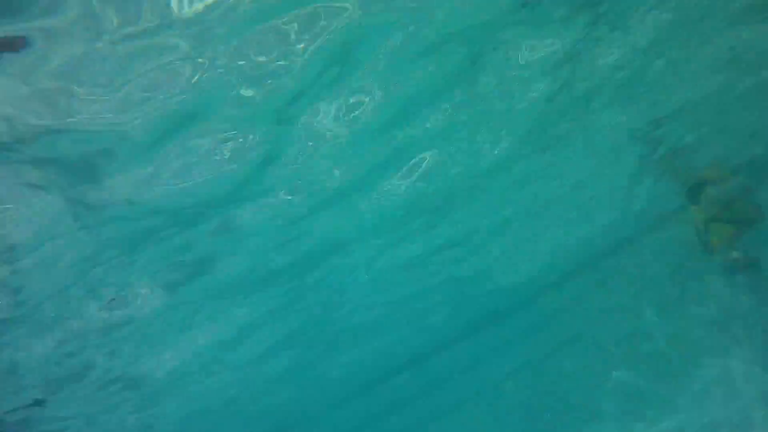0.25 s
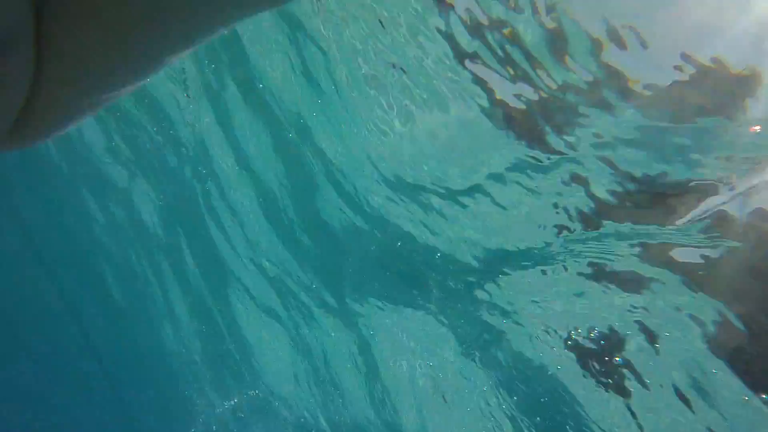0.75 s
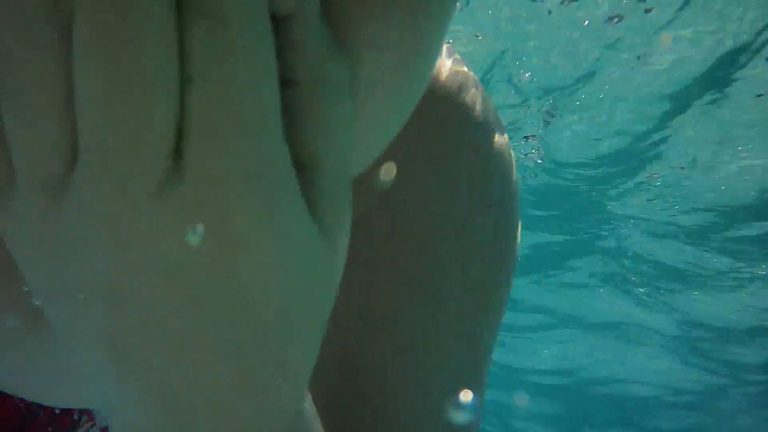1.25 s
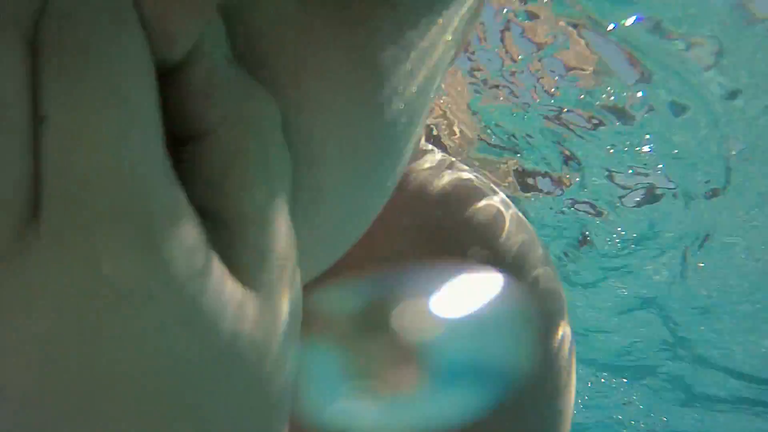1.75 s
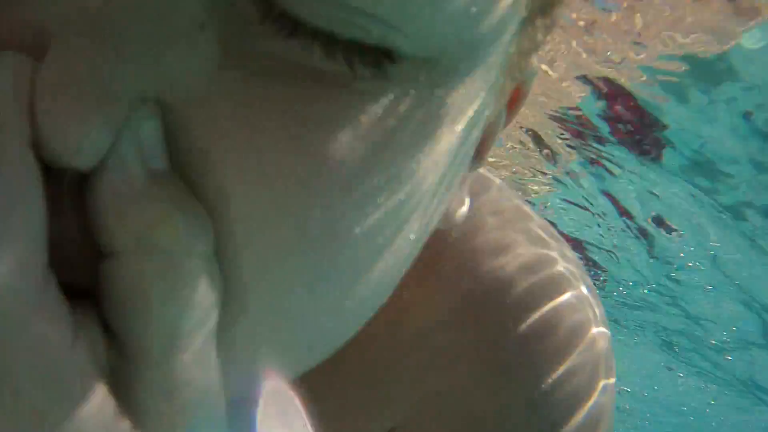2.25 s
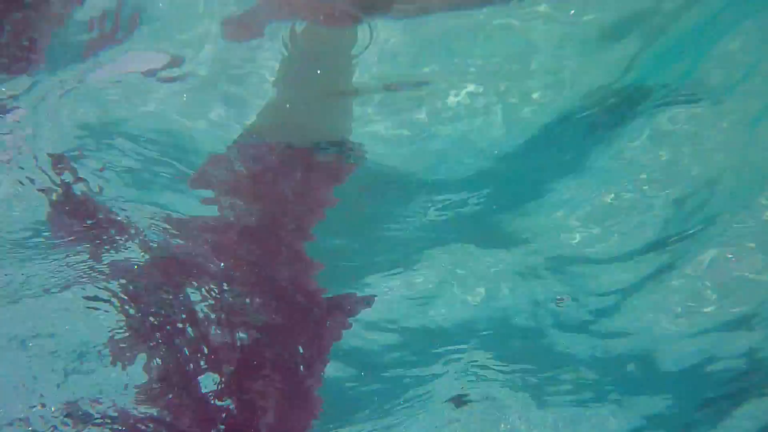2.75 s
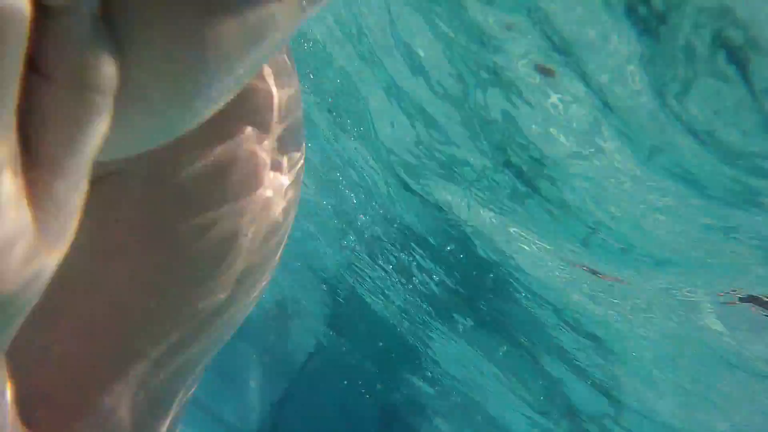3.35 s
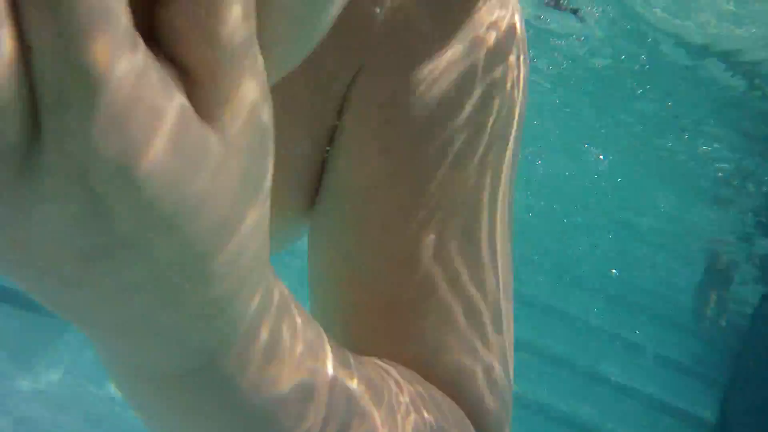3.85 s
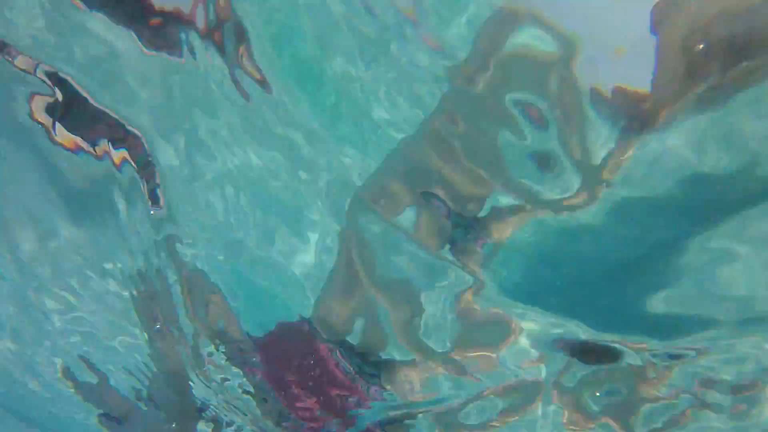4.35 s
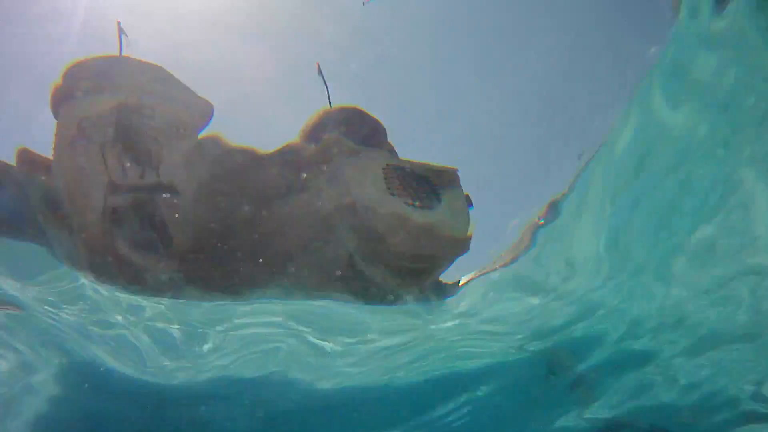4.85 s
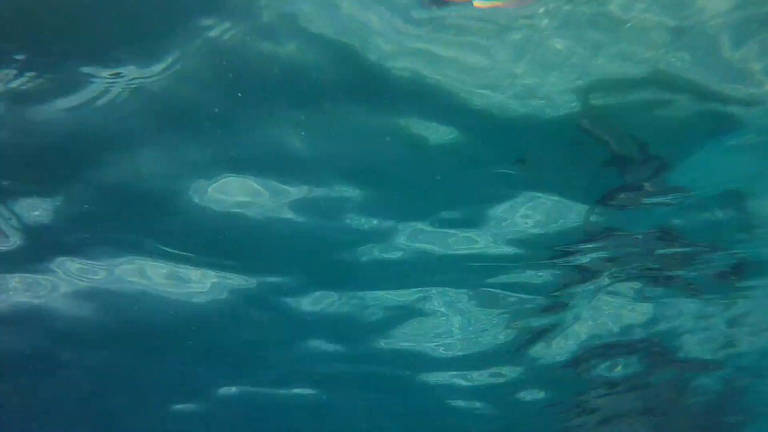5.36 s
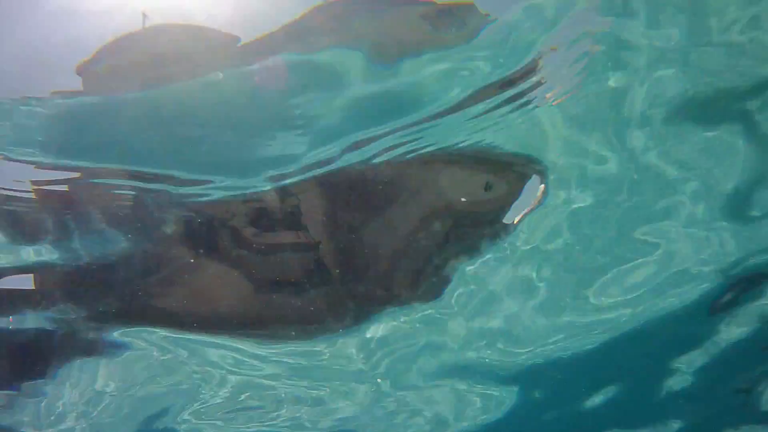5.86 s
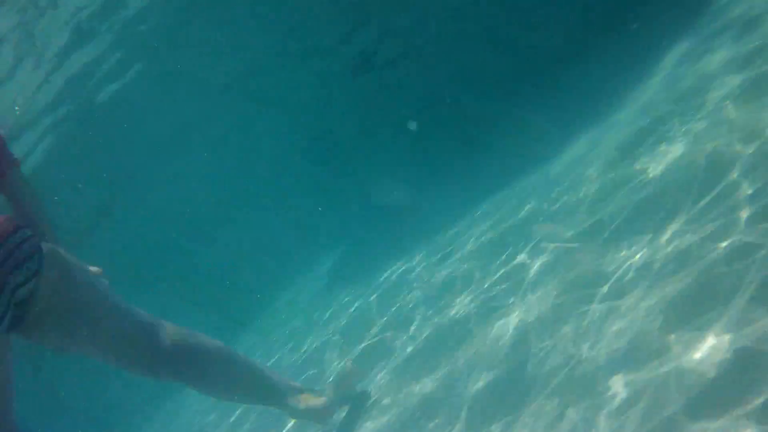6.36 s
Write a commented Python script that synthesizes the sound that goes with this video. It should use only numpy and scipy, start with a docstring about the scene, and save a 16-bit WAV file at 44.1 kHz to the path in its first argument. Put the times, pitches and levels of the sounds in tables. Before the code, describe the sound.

A small camera in a plastic housing is moved about under water in a pool. A low, lumpy surge and faint hiss run throughout. Hollow knocks and tiny bubble plinks come first, then a short rush of froth and a flurry of louder knocks. A quieter stretch of scattered bloops and taps follows, until a loud plunge gulps, sprays and trails off in bubbles. Everything sounds muffled, with a gritty treble edge.

```python
"""Water surges against a microphone port over a faint hiss: a small camera in a plastic housing is being
moved about under water in a pool. Knocks of water ring the housing, bubbles plink and bloop, froth rushes
past, and a plunge ends the scene. The recorder samples at 6 kHz and holds each value, which mirrors all
sound up into the treble."""
import sys
import numpy as np
from scipy import signal
from scipy.fft import rfft, irfft
from scipy.io import wavfile

SR = 44100
rng = np.random.default_rng(int(sys.argv[2]) if len(sys.argv) > 2 else 0)


def generate_wav(sig):
    """Save sig (samples, or channels by samples) to the path in sys.argv[1] as 16-bit PCM at SR."""
    pcm = np.round(np.clip(np.atleast_2d(sig).T, -1, 1) * 32767).astype(np.int16)
    wavfile.write(sys.argv[1], SR, pcm)


N = 291711

# The tone of the surge. Each row: frequency in Hz, relative level in dB.
SURGE_SPECTRUM = [(2, -0.5), (6, -4), (12, -0.5), (25, -13.5), (50, -19.5), (100, -33.5), (200, -45),
                  (400, -70)]
# Water pushing past the port. Each row: time in seconds, surge level in dB.
SURGE_LEVELS = [(0.0, -48), (0.03, -38.5), (0.44, -29.5), (0.92, -25), (0.99, -16), (1.53, -33.5),
                (1.56, -29), (2.56, -36.5), (2.72, -18.5), (3.11, -25), (3.18, -21), (3.29, -43),
                (3.33, -19.5), (3.79, -26), (4.07, -33), (4.14, -24), (4.67, -35), (4.8, -25), (4.86, -38),
                (5.71, -38), (5.93, -16), (6.61, -36)]
# Far hiss in the housing. Each row: time in seconds, low wash in dB, high wash in dB.
WASH_LEVELS = [(0.0, -60, -63), (0.18, -51.5, -55), (0.39, -46.5, -55), (0.77, -49, -55), (1.01, -39, -46),
               (1.16, -50.5, -54), (1.62, -54, -56), (2.17, -60, -54.5), (2.58, -54.5, -56.5),
               (2.98, -48.5, -48.5), (3.59, -49, -50), (3.96, -52, -54), (5.19, -48, -52.5),
               (5.74, -53.5, -58), (5.93, -57, -53), (6.09, -29.5, -35), (6.39, -44, -54), (6.61, -47, -53)]
# The housing's low body and high wall modes. Each row: pitch in Hz, width in Hz, relative level in dB.
BODY_MODES = [(216, 40, -15), (328, 70, -6.5), (499.7, 36.4, 7), (630.5, 128, 0)]
WALL_MODES = [(1003, 83, 4), (1417, 107, -1), (1595, 273, 0.5), (2000, 206, -6.5), (2403, 77, -2),
              (2573, 340, -5)]
# Water hitting the housing. Each row: start in seconds, thud in dB, air pocket pitch in Hz, crack in dB.
WATER_KNOCKS = [(0.129, -36.5, 460, -53), (0.187, -35, 382, -54), (0.225, -25, 227, -46.5),
                (0.27, -17.5, 416, -32.5), (0.277, -14.5, 465, -27), (0.314, -24, 424, -49),
                (0.369, -21.5, 404, -43), (0.485, -21.5, 433, -40), (0.796, -29.5, 686, -33.5),
                (0.838, -32.5, 420, -44.5), (0.858, -29.5, 277, -47), (0.93, -46, 202, -40),
                (0.947, -23.5, 326, -40), (0.969, -28, 484, -36), (0.981, -29, 364, -42),
                (1.03, -26, 248, -47), (1.048, -15, 370, -29.5), (1.057, -10.5, 490, -26.5),
                (1.071, -12, 470, -29), (1.075, -16.5, 500, -27.5), (1.083, -20, 480, -37),
                (1.097, -16, 500, -31.5), (1.114, -27, 245, -33), (1.136, -18, 373, -33),
                (1.148, -20, 310, -32), (1.17, -15.5, 330, -32.5), (1.194, -21, 494, -60),
                (1.338, -36, 630, -47.5), (1.408, -33, 450, -57), (2.648, -35.5, 358, -66),
                (2.904, -32, 390, -47), (2.993, -36.5, 520, -49), (3.37, -28, 490, -50),
                (3.407, -28.5, 294, -46), (4.377, -31, 483, -49), (4.581, -26.5, 488, -39),
                (4.627, -28, 484, -44), (4.729, -36, 463, -52), (4.771, -32, 510, -55),
                (4.89, -36, 466, -56.5), (5.463, -36, 496, -44.5), (6.011, -15, 474, -23),
                (6.098, -13, 474, -24), (6.143, -21, 514, -32), (6.25, -26.5, 473, -53)]
# Small bubbles bursting. Each row: start in seconds, relative level in dB, pitch in Hz.
BURSTING_BUBBLES = [(0.387, -35, 2390), (0.44, -35, 1800), (0.4486, -32.5, 1580), (0.4567, -32, 2380),
                    (0.487, -28, 2010), (0.4944, -32.5, 2110), (0.5074, -34, 2000), (0.5954, -52, 1490),
                    (0.622, -25.5, 2030), (0.6623, -33, 1820), (6.0244, -9, 1720), (6.0779, -5.5, 2270),
                    (6.0771, -6.5, 1390), (6.1414, -24.5, 1330), (6.2054, -20.5, 2740),
                    (6.2331, -19.5, 1060), (6.2454, -42, 1460), (6.2694, -34.5, 2360), (6.288, -31, 2350),
                    (6.3044, -37, 2380), (6.336, -29.5, 2540), (6.3434, -34.5, 2360), (6.3623, -41, 2000),
                    (6.372, -35, 2390), (6.4364, -31.5, 2800)]
# Ringing bubbles and low thuds of water. Each row: start in seconds, pitch in Hz,
# glide in octaves per second, level in dB, seconds to fall by 60 dB.
BLOOPS_AND_THUDS = [(.797, 730, -5.5, -33, 0.22), (1.5, 226.8, -8, -33, .05), (1.283, 460, 4, -40, 0.22),
                    (1.348, 670, -1.5, -29, 0.12), (1.582, 500, 0, -32, 0.084),
                    (2.521, 1630, -0.5, -38.5, 0.048), (3.091, 546, 0.5, -23, 0.057),
                    (3.215, 675, 1, -33, 0.082), (3.36, 431, 2.5, -30, 0.14), (3.502, 506, 2, -33, 0.13),
                    (4.045, 1350, 2, -35.5, 0.076), (4.18, 593, 4, -33.5, 0.067),
                    (4.325, 498, 4.5, -29, 0.11), (4.505, 1935, -5.5, -29, 0.048),
                    (4.518, 1440, -2.5, -33, 0.042), (4.634, 508, -2.5, -32, .14),
                    (4.755, 1036, -2, -35, 0.053), (4.774, 89, -15, -22.5, 0.11),
                    (5.463, 1480, 2.5, -32, .05), (5.945, 300, 6.5, -5, 0.24), (6.1, 120, -8, -29, .07),
                    (6.335, 463, 0.5, -23, 0.1), (6.525, 2900, 5, -34, 0.035)]
# Froth sweeping over the housing. Each row: start, rise and hold in seconds, gulp in dB, spray in dB.
FROTH_RUSHES = [(.8, .03, 0.095, -52, -41), (0.92, 0.047, 0.019, -34, -24.5),
                (1.043, 0.011, 0.061, -30, -32), (5.893, 0.063, 0.06, -9.5, -4),
                (6.044, 0.022, 0.028, -23, -11.5), (6.189, 0.044, 0.0058, -50, -21),
                (6.283, 0.039, 0.12, -54, -48)]
# The air pocket under the froth. Each row: pitch in Hz, width in Hz, relative level in dB.
GULP_MODES = [(338, 58, -10), (460, 79, -2), (666, 46, -19.5)]

POCKET_WIDTH_HZ, POCKET_SWELL_HZ = 91, 300
FROTH_RISE_DB, GULP_FALL_DB_S, SPRAY_FALL_DB_S = 26.5, 269, 300
SAMPLE_HZ, GUARD_HZ, CUTOFF_HZ, DC_OFFSET = 6000, 3050, 16150, 0.03


def from_db(db):
    return 10 ** (np.asarray(db) / 20)


def rms_one(x):
    return x / np.sqrt(np.mean(x ** 2) + 1e-20)


def butter(x, hz, kind, order):
    return signal.sosfilt(signal.butter(order, hz, kind, fs=SR, output="sos"), x)


def fader_curves(rows):
    """Each level column of a table, drawn out to one value per sample."""
    times, *columns = np.transpose(rows)
    return [np.interp(np.arange(N) / SR, times, column) for column in columns]


def drift(rate_hz):
    """A smooth random wobble; rms about 1."""
    step, settle = 40, 2000
    pole = np.exp(-2 * np.pi * rate_hz * step / SR)
    noise = rng.standard_normal(N // step + settle + 2)
    slow = signal.lfilter([1], [1, -2 * pole, pole * pole], noise)[settle:]
    return np.interp(np.arange(N) / step, np.arange(len(slow)), rms_one(slow))


def resonance(x, hz, width):
    """One ringing mode; a unit click rings with height 1."""
    pole, angle = np.exp(-np.pi * width / SR), 2 * np.pi * hz / SR
    return signal.lfilter([0, np.sin(angle)], [1, -2 * pole * np.cos(angle), pole * pole], x + 1e-18)


def modes(x, table):
    """Modes ringing side by side, their peaks balanced by the table's levels."""
    return sum(from_db(db) * width * resonance(x, hz, width) for hz, width, db in table)


def grains(per_s, spread_db):
    """Random clicks of uneven size; rms 1."""
    sizes = from_db(spread_db * np.minimum(rng.exponential(1, N), 5)) * rng.choice([-1, 1], N)
    return rms_one(sizes * (rng.random(N) < per_s / SR))


def rattles(count, decay_s, attack_s=0.00035, tail_s=0.0057):
    """Short bursts of noise with a faint tail; each has rms 1."""
    t = np.arange(round(.06 * SR)) / SR
    envelope = (1 - np.exp(-t / attack_s)) * (np.exp(-t / decay_s) + 0.19 * np.exp(-t / tail_s))
    return [rms_one(noise * envelope) for noise in rng.standard_normal((count, len(t)))]


def rush(start, rise, hold, fall_db_s):
    """An envelope that swells to 1, holds and dies away."""
    t = np.arange(N) / SR - start
    swell_db = FROTH_RISE_DB * np.minimum(t / rise - 1, 0)
    fall_db = fall_db_s * np.maximum(t - rise - hold, 0)
    return (t > 0) * from_db(swell_db - fall_db)


def surge(lumps_db=2.5):
    """A lumpy rumble: pressure on the microphone port as the water pushes past."""
    hz = np.maximum(np.arange(N // 2 + 1) * SR / N, 1)
    curve_hz, curve_db = np.transpose(SURGE_SPECTRUM)
    tone = from_db(np.interp(np.log(hz), np.log(curve_hz), curve_db))
    level_db = fader_curves(SURGE_LEVELS)[0] + lumps_db * drift(6)
    rumble = irfft(rfft(rng.standard_normal(N)) * tone, N)
    return from_db(level_db) * rms_one(rumble)


def wash(swell_db=2.7):
    """Far hiss shakes the housing; each mode swells on its own and is nudged by stray bubbles."""
    hiss = .3 * grains(250, spread_db=3) + rng.standard_normal(N)
    bed = np.zeros(N)
    for table, nudge, level_db in zip((BODY_MODES, WALL_MODES), (1.1, 0.5), fader_curves(WASH_LEVELS)):
        ring = np.zeros(N)
        for mode in table:
            swelling = hiss * from_db(swell_db * drift(12.7))
            ring += modes(swelling + nudge * grains(30, spread_db=3), [mode])
        bed += from_db(level_db) * rms_one(ring)
    return butter(bed, 2557, "low", order=10)


def knocks():
    """Each knock of water thumps the body, rings its own air pocket and cracks in the walls."""
    thumps, pockets, cracks = np.zeros((3, N))
    bursts = rattles(len(WATER_KNOCKS), decay_s=.0016)
    for (start, thud_db, pocket_hz, crack_db), burst in zip(WATER_KNOCKS, bursts):
        i = round(start * SR)
        thumps[i] = from_db(thud_db)
        click = np.arange(len(burst)) == 0
        pocket = resonance(click, pocket_hz, POCKET_WIDTH_HZ)
        pocket = resonance(pocket, pocket_hz, POCKET_SWELL_HZ)   # rounds off the attack
        pockets[i:i + len(burst)] += from_db(thud_db) * pocket / np.abs(pocket).max()
        cracks[i:i + len(burst)] += from_db(crack_db) * burst
    thuds = pockets + from_db(-52.5) * modes(thumps, BODY_MODES)
    cushioned = butter(thuds, 1280, "low", order=2)   # water softens the blow
    bite = from_db(-3.5) * cracks + from_db(-76) * modes(cracks, WALL_MODES)
    return cushioned + butter(bite, 943, "high", order=4)


def plinks():
    """Small bubbles burst at the port: each snaps and rings briefly at its own pitch."""
    out = np.zeros(N)
    bursts = rattles(len(BURSTING_BUBBLES), decay_s=0.0029)
    for (start, level_db, hz), burst in zip(BURSTING_BUBBLES, bursts):
        snap = from_db(-24.5) * resonance(burst, hz, width=820)
        ring = from_db(-33.5) * resonance(burst, hz, width=133)
        out[round(start * SR):][:len(burst)] += from_db(level_db) * (snap + ring)
    return butter(out, 1200, "high", order=4)


def bloops_and_thuds(attack_s=0.0064, flutter_db=3.5):
    """Ringing bubbles and low thuds of water: dying sines whose pitch slides and whose level flutters."""
    out = np.zeros(N + SR)
    t = np.arange(round(.25 * SR)) / SR
    for start, hz, glide, level_db, t60 in BLOOPS_AND_THUDS:
        tone = np.sin(2 * np.pi * np.cumsum(hz * 2 ** (glide * t)) / SR)
        envelope = from_db(level_db - 60 * t / t60) * (1 - np.exp(-t / attack_s))
        out[round(start * SR):][:len(t)] += envelope * tone
    return from_db(flutter_db * drift(63)) * out[:N]


def froth():
    """Collapsing bubbles crackle: they make the air pocket gulp, and their bright edge is the spray."""
    crackle = grains(1400 * from_db(2.5 * drift(40)), spread_db=3.5)
    fizz = butter(crackle + 0.35 * rng.standard_normal(N), 1280, "high", order=2)
    spray = rms_one(fizz) + 0.23 * rms_one(modes(crackle, WALL_MODES))
    pocket = modes(crackle + 0.81 * rng.standard_normal(N), GULP_MODES)
    gulp = rms_one(butter(pocket, 300, "high", order=2))
    out = np.zeros(N)
    for start, rise, hold, gulp_db, spray_db in FROTH_RUSHES:
        out += from_db(gulp_db) * rush(start, rise, hold, GULP_FALL_DB_S) * gulp
        out += from_db(spray_db) * rush(start, rise, hold, SPRAY_FALL_DB_S) * spray
    return out


def scene():
    """The mono mix: a bed of surge and wash, with froth, knocks, bubbles and thuds on top."""
    return (surge() + wash() + froth() + knocks() + plinks() + bloops_and_thuds())[None]


def record(dry):
    """The recorder samples at 6 kHz, clips overloads and holds each value, adding a gritty treble."""
    guarded = butter(dry[0], GUARD_HZ, "low", order=8)
    values = np.clip(signal.resample_poly(guarded, SAMPLE_HZ, SR) + DC_OFFSET, -1, 1)
    held = np.repeat(values, 8)   # a staircase at 48 kHz
    mirrored = signal.resample_poly(held, SR, 8 * SAMPLE_HZ)[:N]
    top_cut = signal.cheby2(20, 70, CUTOFF_HZ, fs=SR, output="sos")
    return signal.sosfilt(top_cut, mirrored)[None]


dry = scene()
out = record(dry)
generate_wav(out)
```